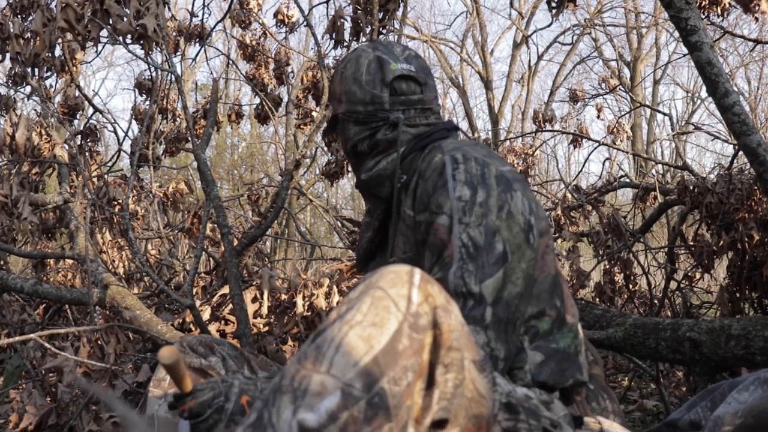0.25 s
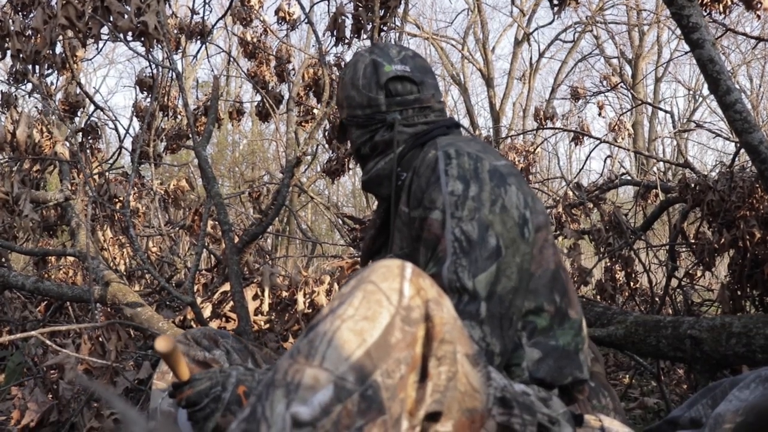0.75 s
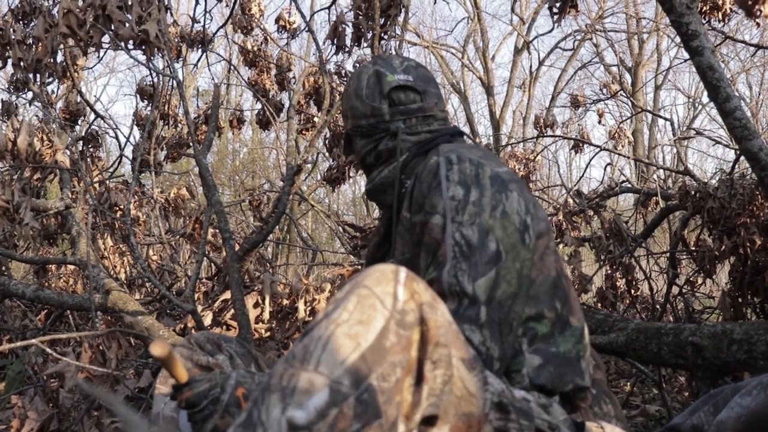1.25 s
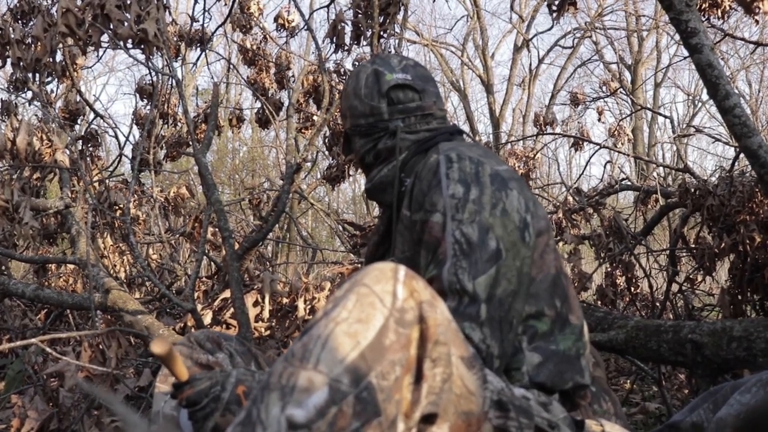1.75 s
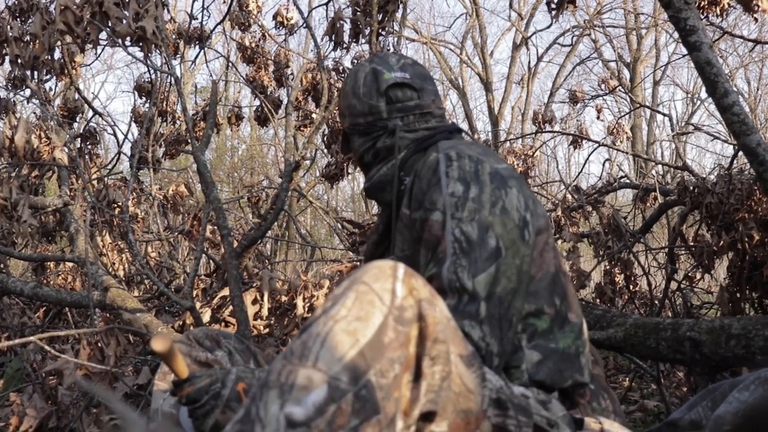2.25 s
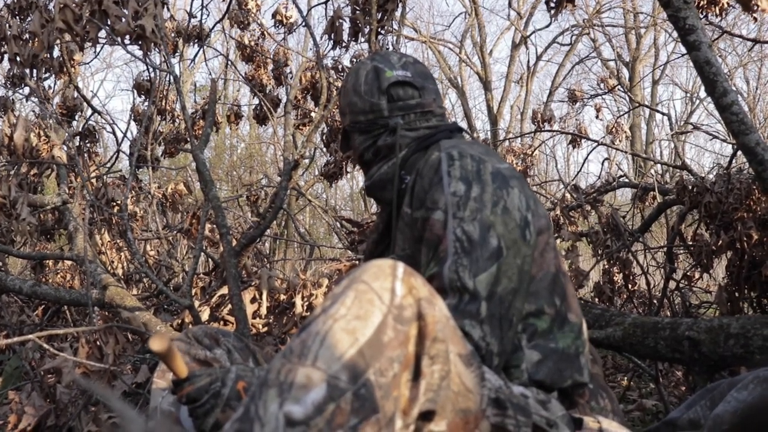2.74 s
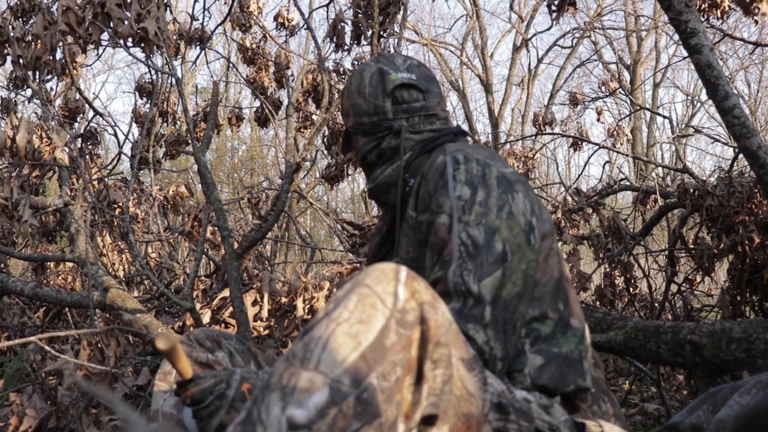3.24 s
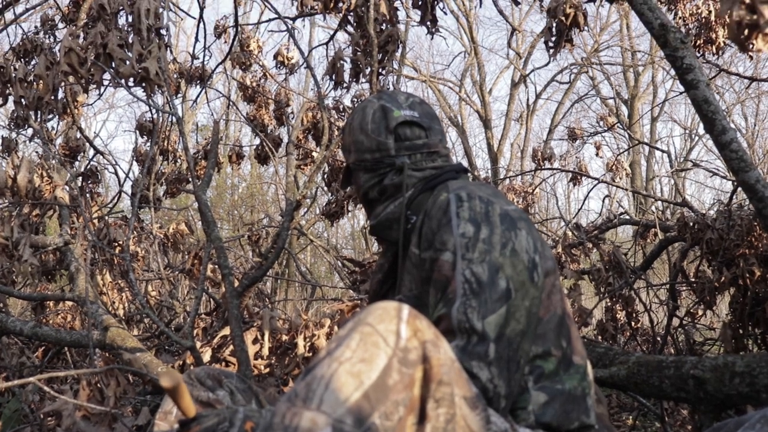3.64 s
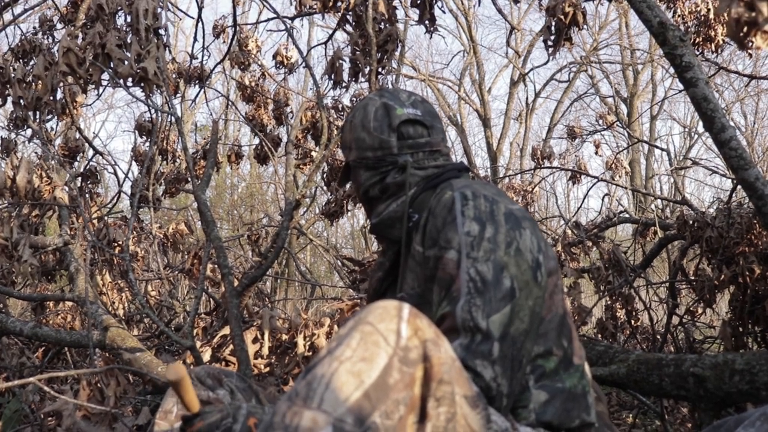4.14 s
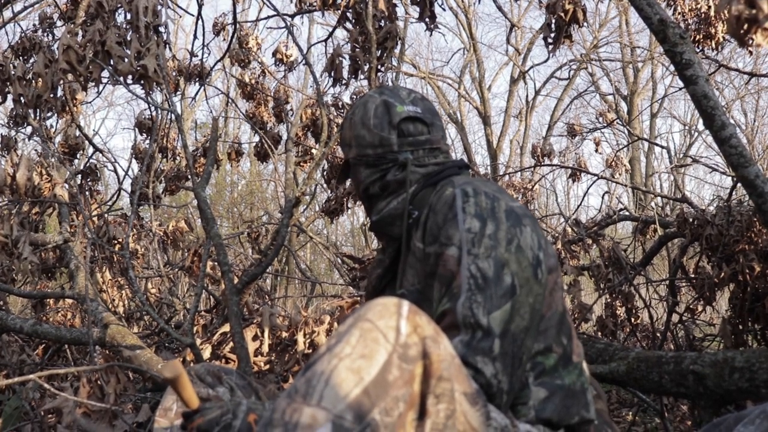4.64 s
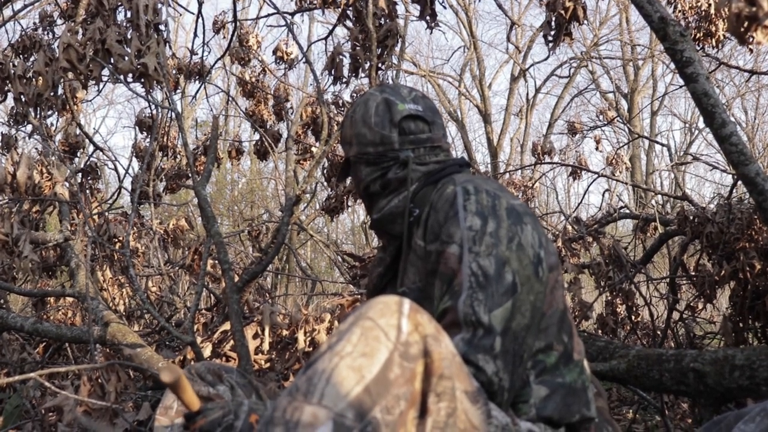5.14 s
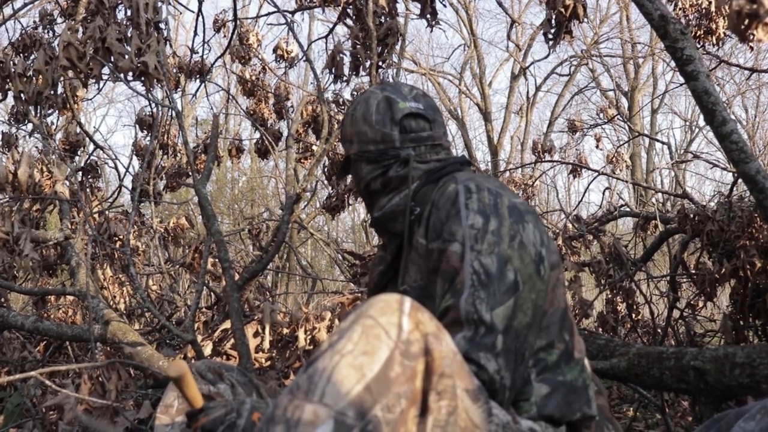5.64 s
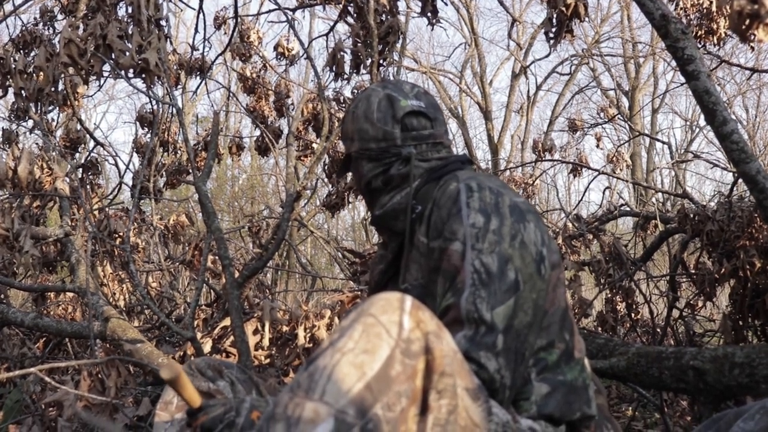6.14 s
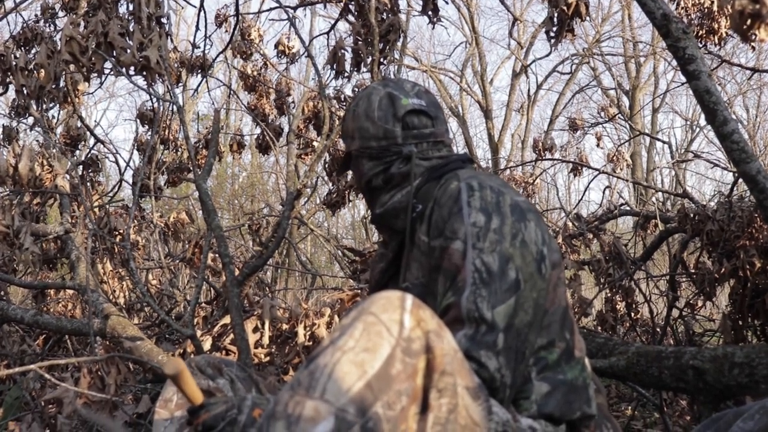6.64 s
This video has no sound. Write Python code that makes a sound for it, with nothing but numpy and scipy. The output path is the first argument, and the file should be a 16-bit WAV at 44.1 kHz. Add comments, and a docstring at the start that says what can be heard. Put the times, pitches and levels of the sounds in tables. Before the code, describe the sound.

Quick, broken chirps from a nearby turkey call come in a few short bursts. They give way to a steady series of reedy yelps like a hen turkey's, most dipping in pitch and lifting at the end, loudest late in the run. The outdoor background is very quiet: a woodland hush, a light low rumble of air, barely stirring clothing and a few thin, falling bird whistles far away.

```python
"""Short stuttering chirps in quiet woodland, then a run of raspy hen yelps that quicken and grow louder.
A hunter works a turkey call: at first it only catches; with more effort it holds a tone that dips in pitch.
The tone is a harmonic stack coloured by the call's body, the rasp is noise released once a cycle,
and the trees scatter both. Behind: faint far bird whistles, a steady hush, a light rumble of air,
stirring clothes, one dry tick and one soft bump."""
import sys
import numpy as np
from scipy import signal
from scipy.fft import rfft, irfft
from scipy.io import wavfile
from scipy.ndimage import uniform_filter1d

SR = 44100
rng = np.random.default_rng(int(sys.argv[2]) if len(sys.argv) > 2 else 0)


def file_out(sig):
    """Save sig as 16-bit WAV at sys.argv[1]."""
    # one column per channel
    cols = np.atleast_2d(sig).T
    # limit, then scale
    lim = np.clip(cols, -1, 1)
    pcm = np.round(lim * 32767).astype(np.int16)
    wavfile.write(sys.argv[1], SR, pcm)


N = 303849
TIME = np.arange(N) / SR

# The call catching briefly. Each row: centre in seconds, level in dB, pitch in Hz,
# width at half height in seconds.
CHIRPS = [(0.281, -28.5, 747, 0.007), (0.335, -23, 746, .013), (0.363, -36, 731, .0055),
          (0.391, -21, 748.6, .011), (0.432, -21, 762, .016), (0.48, -18.5, 725, .014),
          (1.01, -24, 744.3, 0.0097), (1.073, -28, 753, 0.0096), (1.126, -39, 740, .007),
          (1.148, -20.5, 715, 0.01), (1.197, -28.5, 738, 0.013), (1.238, -26, 739, .018),
          (1.277, -24, 728.4, .022), (1.322, -28.5, 751, .019), (1.623, -31.5, 745, 0.0097),
          (1.65, -26, 731, 0.0098), (1.688, -23.5, 732, .016), (1.729, -20.5, 712.7, .012),
          (1.766, -23, 739, 0.019), (1.806, -23, 759, .015), (1.838, -24, 752, .015),
          (2.156, -35, 731, .012), (2.18, -29.5, 718, 0.02), (2.213, -23, 698, .015),
          (2.657, -41, 736.4, .02)]
# Held yelps. Each row: start and length in seconds, crest as a share of the length, crest level and
# swell up to it in dB, first, crest and last pitch in Hz, stutter depth in dB, its settling time
# in seconds, then relative rasp, brightness and top harmonics in dB.
YELPS = [(2.242, 0.1, 0.79, -29, -6.5, 723.6, 748, 762.0, 6.5, 0.0762, -49.5, -5.9, -1),
         (2.673, 0.17, 0.93, -23.5, 7.8, 727.0, 748.7, 763.6, 4.0, 0.179, -49.5, -1.5, 4),
         (3.086, 0.16, 0.47, -21.0, 2.9, 714, 708.6, 780, 9.5, 0.056, -55.2, -3, 5),
         (3.484, 0.16, 0.47, -21, 14.5, 726, 690.3, 751, 6.5, 0.074, -54.4, -2, 0),
         (3.878, 0.19, 0.69, -18, 14.5, 683, 661, 761, 13.5, 0.023, -60, -2.1, -3.2),
         (4.271, 0.16, 0.3, -20, 14.6, 749.0, 679.6, 750.0, 7.5, 0.0578, -61, -1.3, -5),
         (4.69, 0.15, 0.43, -19.0, 4.5, 740.5, 684, 741, 18.0, 0.022, -62.5, -2, -3.5),
         (5.041, 0.17, 0.47, -19.5, 10.5, 725.0, 653.7, 681.0, 5, 0.012, -52, -3, -2.5),
         (5.405, 0.17, 0.67, -16, 7, 689, 649.0, 728.6, 2.5, 0.03, -53, -6.5, 0.5),
         (5.78, 0.15, 0.63, -12.5, 10, 745.7, 660.0, 753, 8, 0.026, -55, -4.5, -0.7),
         (6.178, 0.13, 0.54, -15.5, 8, 729, 680.4, 750, 6.5, 0.028, -56.9, -4.5, 0),
         (6.529, 0.15, 0.58, -16.1, 9.5, 723.5, 662.8, 745, 3.5, 0.028, -61, -3, 0.5),
         (6.876, 0.17, 0.47, -20.5, 13, 688, 670, 755, 4.5, 0.011, -55, -7, 2)]


def gain_of(db):
    """Decibels to amplitude."""
    return 10 ** (np.asarray(db) / 20)


def unit_rms(x):
    """Scales to rms 1."""
    return x / np.sqrt(np.mean(x ** 2) + 1e-20)


def curve_db(points, hz):
    """Interpolates (Hz, dB) points on a log-frequency axis."""
    f, db = np.transpose(points)
    return np.interp(np.log(hz + 1), np.log(f + 1), db)


def noise(shape):
    """Noise of rms 1 with magnitude spectrum shape(Hz)."""
    return unit_rms(irfft(rfft(rng.standard_normal(N)) * shape(np.fft.rfftfreq(N, 1 / SR)), N))


def wander(rate_hz):
    """Random drift up to about rate_hz."""
    return noise(lambda f: 1 / (1 + (f / rate_hz) ** 4))


def bell(peak_s, rise_s, fall_s, squareness=2):
    """Bell envelope; rise and fall are taken at half height."""
    out, near = np.zeros(N), abs(TIME - peak_s) < 5 * max(rise_s, fall_s)
    t = TIME[near] - peak_s
    out[near] = 2 ** -abs(t / np.where(t < 0, rise_s, fall_s)) ** squareness
    return out


def surges(rows, floor_db):
    """Steady floor plus bell-shaped surges, summed in power."""
    power = sum((gain_of(db) * bell(s, half_s, half_s)) ** 2 for s, db, half_s in rows)
    return np.sqrt(gain_of(floor_db) ** 2 + power)


def woodland_hush(above_500_hz_db=-52.5, low_cut_hz=75):
    """Steady broadband hush of the wood."""
    # Each row: frequency in Hz, relative spectral density in dB.
    spectrum = [(12, -32.5), (20, -24), (67, -5), (110, -9), (337, -28.5), (600, -26.5), (1000, -18.5),
                (1480, -20), (1610, -22.5), (1760, -24.5), (2600, -25.5), (2820, -22.5), (3160, -24.5),
                (3630, -24.5), (7310, -35), (14700, -37.5), (16000, -41)]
    hush = noise(lambda f: gain_of(curve_db(spectrum, f)) / (1 + (low_cut_hz / (f + 1)) ** 4))
    upper = signal.sosfilt(signal.butter(4, 500, "high", fs=SR, output="sos"), hush)
    return gain_of(above_500_hz_db) * hush / upper.std()


def air_rumble(trim_db=2):
    """Gusts of air swell a deep rumble."""
    # Each row: peak time in seconds, relative level in dB, half width in seconds.
    gusts = [(.25, -47.5, 0.95), (1.09, -38.5, .045), (1.38, -40, 0.12), (1.93, -47.5, 0.12),
             (2.97, -45.5, 0.054), (3.33, -49, .09), (6.55, -45, .04)]
    rumble = noise(lambda f: f ** 2 / (f ** 2 + 200) / (1 + (f / 32) ** 3.5))
    return gain_of(trim_db) * surges(gusts, floor_db=-60.5) * rumble


def clothes_rustle(trim_db=-1):
    """Stirring clothes give a faint, low rustle."""
    # Each row: peak time in seconds, relative level in dB, half width in seconds.
    stirs = [(.05, -58.5, .25), (.85, -55, 0.21), (1.3, -51, 0.21), (2.39, -52, 0.012),
             (2.92, -54.5, 0.147), (3.55, -55, 0.17), (6.2, -61.5, 0.51)]
    rustle = noise(lambda f: f ** 2 / (f ** 2 + 110 ** 2) / (1 + (f / 300) ** 2.3))
    return gain_of(trim_db) * surges(stirs, floor_db=-64) * rustle


def far_birds(trim_db=-3, fall_share=0.027):
    """Slowly falling whistles, blurred by their long path through the wood."""
    # Each row: start and length in seconds, first pitch in Hz, relative level in dB.
    notes = [(0.199, 0.36, 3310, -52.5), (.2, 0.34, 2450, -51.5), (1.122, 0.36, 3276, -54),
             (1.15, 0.43, 2487, -57.5), (2.378, 0.22, 1639, -56), (2.352, .4, 3293, -60.5),
             (3.223, 0.7, 3310, -52), (3.35, 0.53, 2472, -51), (3.85, 0.48, 3380, -57.5),
             (4.253, 0.41, 3262, -54.5)]
    out, blur = np.zeros(N), wander(60) + 1j * wander(60)
    for start_s, length_s, hz, db in notes:
        on = (TIME > start_s) & (TIME < start_s + length_s)
        progress = (TIME[on] - start_s) / length_s
        whistle = np.exp(2j * np.pi * np.cumsum(hz * (1 - fall_share * progress)) / SR)
        blurred = (whistle * np.roll(blur, rng.integers(N))[on]).real
        out[on] += gain_of(db + trim_db) * np.sqrt(np.sin(np.pi * progress)) * blurred
    return out


def call_controls(chirp_bend=0.044, chirp_glide=0.014, yelp_trim_db=-0.3, slip_bend=0.0611, grit_db=-37):
    """Strength, pitch, rasp and tone colour of the call through its chirps and yelps."""
    # The held tone nearly slips, thinning and rising. Each row: time in seconds,
    # share of strength lost, half width in seconds.
    slips = [(2.314, 0.64, 0.0056), (3.604, 0.57, 0.004), (3.974, 0.21, .015), (5.144, 0.22, 0.011)]
    strength, rasp, bright_db, top_db, weighted_hz, weight = np.zeros((6, N))
    for row in YELPS:
        near, held, hz, *colour = yelp(*row)
        rasp[near], bright_db[near], top_db[near] = colour
        strength[near] = gain_of(yelp_trim_db) * held
        weighted_hz[near], weight[near] = held ** 2 * hz, held ** 2
    for centre_s, db, hz, width_s in CHIRPS:
        shape = bell(centre_s, width_s / 2, width_s / 2, squareness=2.4)
        chirp = gain_of(db) * shape
        strength = np.maximum(strength, chirp)
        bright_db += 1.2 * shape
        top_db -= shape
        # Pitch sags where the swing is widest and creeps up through the chirp.
        creep = chirp_glide * np.tanh(2 * (TIME - centre_s) / width_s)
        weighted_hz += chirp ** 2 * hz * (1 + chirp_bend * (1 - shape) + creep)
        weight += chirp ** 2
    slip = np.clip(sum(share * bell(s, half_s, half_s) for s, share, half_s in slips), 0, 1)
    pitch_hz = (weighted_hz + 1e-9) / (weight + 1e-12) * (1 + slip_bend * slip)
    rasp = np.hypot(rasp, gain_of(grit_db) * np.sqrt(strength))  # grit weighs most in soft playing
    return strength * (1 - slip), pitch_hz, rasp, bright_db, top_db


def call_tone(strength, pitch_hz, bright_db, top_db, jitter=0.00684, waver=0.005, shimmer=0.004,
              full_db=-18, build_s=0.0079, dispersion_rad=0.2):
    """Harmonic stack through the call's body; soft playing is duller and less steady."""
    # Body response. Each row: frequency in Hz, gain in dB.
    body = [(600, -36), (660, -15.5), (760, -8.5), (1300, 1), (1500, 0.5), (1920, -15), (2120, -7.5),
            (2300, -16), (2560, -19.5), (2720, -10.5), (3050, -25), (3220, -31.5), (3400, -22),
            (3680, -36.5), (3950, -20.5), (4130, -32.5), (4650, -22), (4950, -41.5), (7000, -59.5)]
    settled = abs(uniform_filter1d(strength, int(build_s * SR)))  # top harmonics need time to build
    effort_db, settled_db = np.clip(20 * np.log10(np.array([strength, settled]) + 1e-9) - full_db, -20, 10)
    unsteady = 2 ** (-effort_db / 20)
    detune = unsteady * (jitter * wander(344) + waver * wander(46.1))
    phase = 2 * np.pi * np.cumsum(pitch_hz * (1 + detune)) / SR
    stack = np.zeros(N)
    for k in range(1, 11):
        octaves = np.log2(min(k, 5) / 2)  # from the second harmonic, which carries the note
        push_db = 0.72 * effort_db if k < 5 else 0.7 * settled_db
        tilt_db = -0.16 * effort_db if k == 1 else octaves * (push_db + bright_db)
        flutter_db = 1.8 * abs(octaves) * wander(34)
        harmonic_db = curve_db(body, k * pitch_hz) + tilt_db + top_db * (k > 5) + flutter_db
        stack += gain_of(harmonic_db) * np.cos(k * phase + dispersion_rad * k ** 2)
    return np.sqrt(2) * strength * stack * (1 + shimmer * unsteady * wander(320)), phase


def call_rasp(level, phase, trim_db=3, throb=0.47, low_hz=640, high_hz=5200):
    """Noise released once a cycle rings in the body's resonances."""
    # Each row: centre and width in Hz, gain in dB.
    resonances = [(870, 190, -2), (1060, 260, 0), (1560, 280, -1), (2250, 260, -8), (2950, 320, -12),
                  (3550, 300, -16), (4400, 450, -11)]
    puffs = rng.standard_normal(N) * (1 + throb * np.cos(phase))
    f = np.fft.rfftfreq(N, 1 / SR)
    body = sum(gain_of(db) / (1 + (2 * (f - hz) / width_hz) ** 2) for hz, width_hz, db in resonances)
    body /= 1 + (low_hz / (f + 1)) ** 10  # the small cavity radiates no bass
    body /= 1 + (f / high_hz) ** 6  # nor much treble
    return gain_of(trim_db) * level * unit_rms(irfft(rfft(puffs) * body, N))


def blip(at_s, db, half_s=0.0025, ring_db=-15, ring_hz=830, ring_t60_s=0.12):
    """The body sounds briefly at its own modes; its cavity rings on."""
    # Each row: frequency in Hz, relative level in dB.
    modes = [(890, 0), (2330, -15)]
    out, near = np.zeros(N), abs(TIME - at_s) < 0.08
    t = TIME[near] - at_s
    body = sum(gain_of(mode_db) * np.sin(2 * np.pi * (hz * t + rng.random())) for hz, mode_db in modes)
    ring = (t > 0) * gain_of(ring_db - 60 * abs(t) / ring_t60_s) * np.sin(2 * np.pi * ring_hz * t)
    out[near] = gain_of(db) * (2 ** -(t / half_s) ** 2 * body + ring)
    return out


def call_edges(chirps_until_s=2.0):
    """Blips as each early chirp catches and lets go, and as each yelp lets go."""
    out = np.zeros(N)
    for centre_s, db, _, width_s in CHIRPS:
        if centre_s < chirps_until_s:
            out += blip(centre_s - 0.45 * width_s, db - 6) + blip(centre_s + 0.7 * width_s, db - 1)
    for start_s, length_s, _, crest_db, *_ in YELPS:
        out += blip(start_s + length_s + 0.005, crest_db - 13)
    return out


def tree_echoes(call, ground_db=-28, ground_s=0.011, scatter_db=-36, t60_s=0.6, dull_hz=1800):
    """One ground reflection and weak scatter from trunks and branches."""
    t = TIME[:SR]
    taps = rng.standard_normal(SR) * (rng.random(SR) < 0.04)
    taps *= gain_of(-60 * t / t60_s) * (t > 0.008)
    ground = gain_of(ground_db) * np.interp(TIME - ground_s, TIME, call)
    scatter = gain_of(scatter_db) * signal.fftconvolve(call, taps / np.linalg.norm(taps))[:N]
    return signal.sosfilt(signal.butter(1, dull_hz, fs=SR, output="sos"), ground + scatter)


def dry_tick(corner_hz=2500):
    """A faint, short puff of wide noise."""
    # Time in seconds, level in dB, half width in seconds.
    puff = (0.883, -46.5, .003)
    at_s, db, half_s = puff
    return gain_of(db) * bell(at_s, half_s, half_s) * noise(lambda f: 1 / (1 + f / corner_hz))


def yelp(start_s, length_s, crest, crest_db, swell_db, first_hz, crest_hz, last_hz, stutter_db, settle_s,
         rasp_db, bright_db, top_db, attack_s=0.0028, release_s=0.003, lead_s=0.024,
         stutter_hz=33.85, stutter_lag_s=0.0054, ease_db=6, sharp_per_db=0.007):
    """Controls for one yelp: it stutters into tone, glides to its crest, then eases off and lifts."""
    near = (TIME > start_s - lead_s) & (TIME < start_s + length_s + 10 * release_s)
    t = TIME[near] - start_s
    before = np.clip(1 - t / length_s / crest, 0, 1)
    after = np.clip((t / length_s - crest) / (1 - crest), 0, 1)
    dip = np.exp(-(t / settle_s) ** 2) * np.sin(np.pi * stutter_hz * (t - stutter_lag_s)) ** 2
    attack = 1 / (1 + np.exp(-t / attack_s))
    release = 1 / (1 + np.exp((t - length_s) / release_s))
    level_db = crest_db - swell_db * before ** 1.06 - ease_db * after ** 2.9 - stutter_db * dip
    hz = crest_hz + (first_hz - crest_hz) * before ** 1.38 + (last_hz - crest_hz) * after ** 2.98
    hz *= 1 + sharp_per_db * stutter_db * dip
    # Rasp starts ahead of the tone and grows where the tone holds least well.
    lead_in = np.clip(1 + t / lead_s, 0, 1) ** 2
    rasp = lead_in * release * gain_of(rasp_db + 6 * before ** 3 + 13 * after + 2 * dip)
    return near, attack * release * gain_of(level_db), hz, rasp, bright_db + 2.5 * after ** 2, top_db


def soft_bump(at_s=2.263):
    """A dull knock of a couple of cycles."""
    # Each row: frequency in Hz, level in dB, fall to half height in seconds.
    modes = [(153, -40.5, 0.00656), (228, -38, 0.0047), (385.6, -48, 0.0031)]
    return sum(gain_of(db) * bell(at_s, fall_s / 2, fall_s) * np.sin(2 * np.pi * hz * (TIME - at_s))
               for hz, db, fall_s in modes)


def scene():
    """The call among the trees over the woodland background, in mono."""
    strength, pitch_hz, rasp, bright_db, top_db = call_controls()
    voiced, phase = call_tone(strength, pitch_hz, bright_db, top_db)
    call = voiced + call_rasp(rasp, phase) + call_edges()
    echoes = tree_echoes(call)
    background = far_birds() + woodland_hush() + air_rumble() + clothes_rustle()
    return (call + echoes + background + dry_tick() + soft_bump())[None]


def record(dry, cutoff_hz=15900):
    """Steep low-pass band limit."""
    return signal.oaconvolve(dry, signal.firwin(511, cutoff_hz, window=("kaiser", 9), fs=SR)[None], "same")


dry = scene()
out = record(dry)
file_out(out)
```